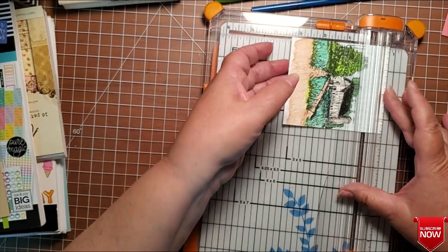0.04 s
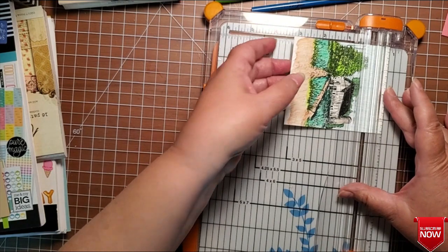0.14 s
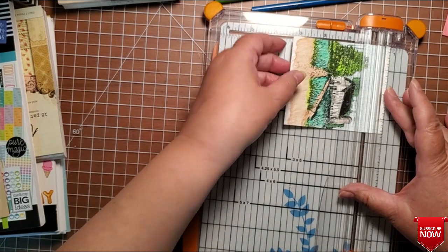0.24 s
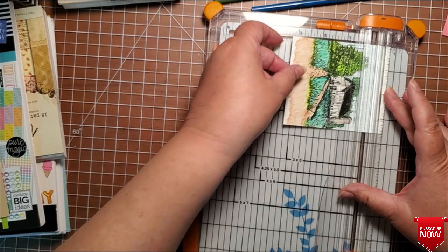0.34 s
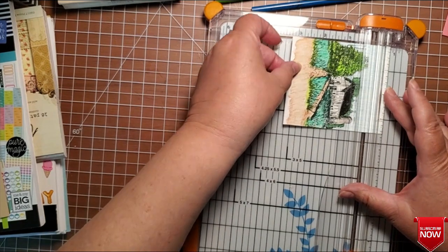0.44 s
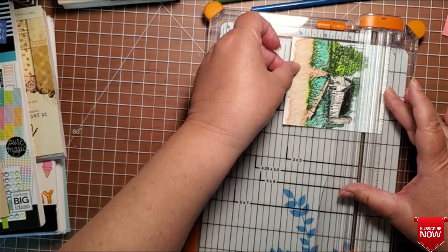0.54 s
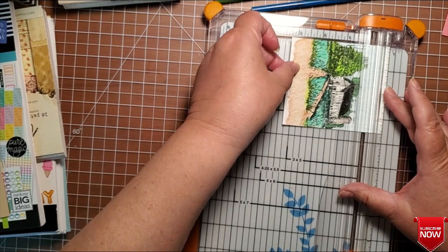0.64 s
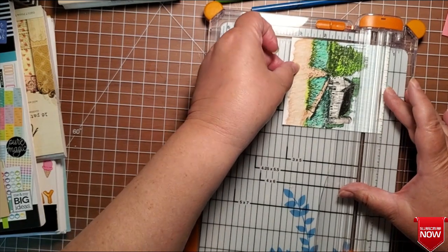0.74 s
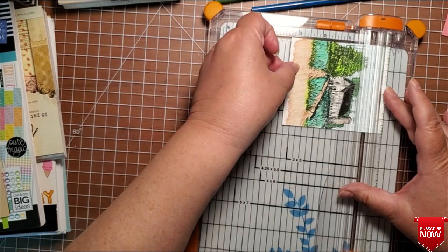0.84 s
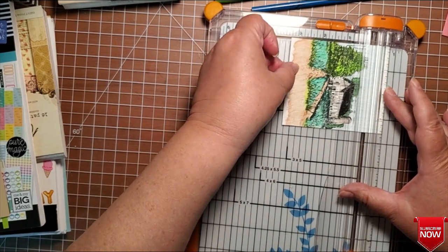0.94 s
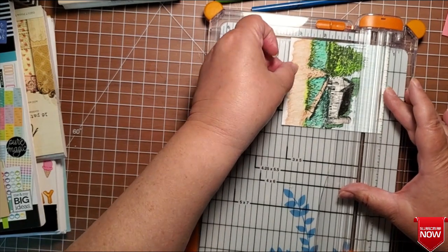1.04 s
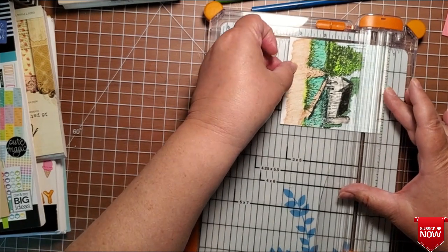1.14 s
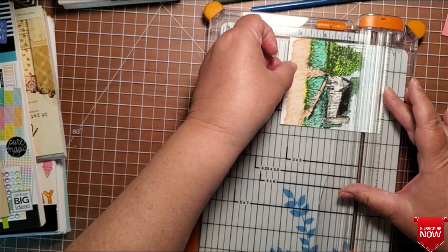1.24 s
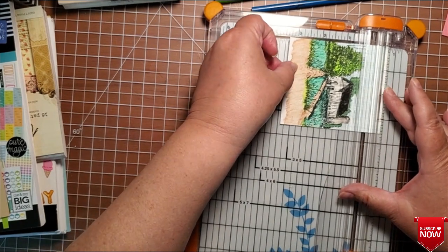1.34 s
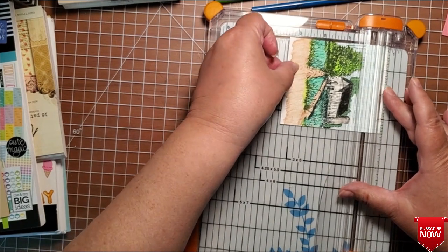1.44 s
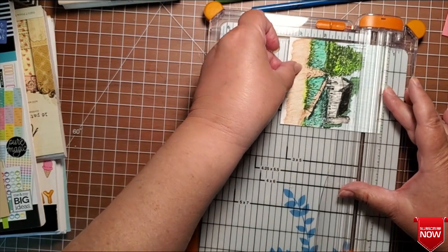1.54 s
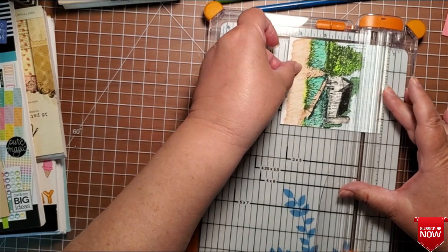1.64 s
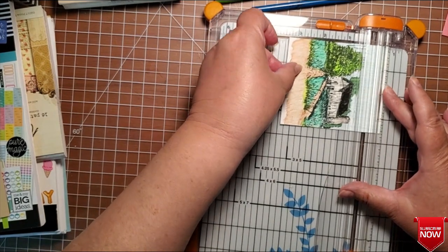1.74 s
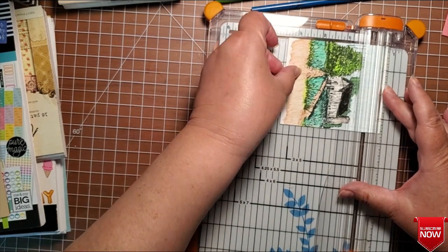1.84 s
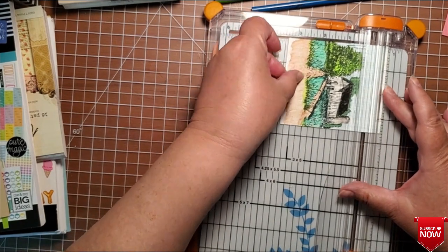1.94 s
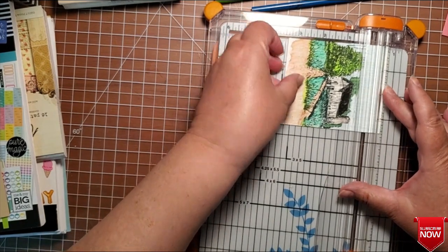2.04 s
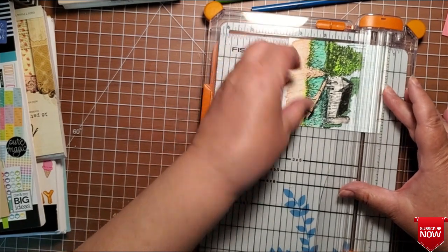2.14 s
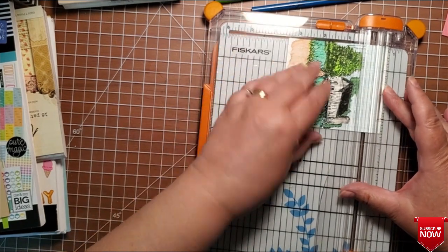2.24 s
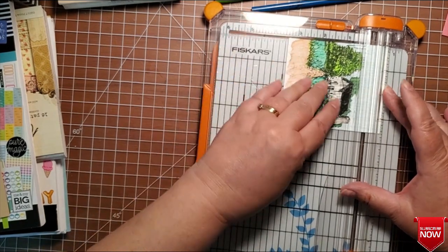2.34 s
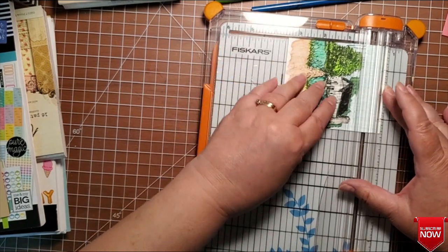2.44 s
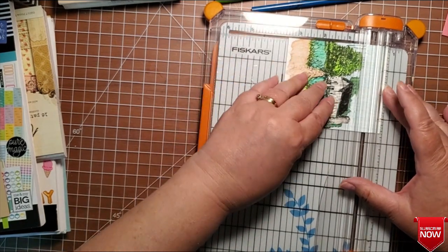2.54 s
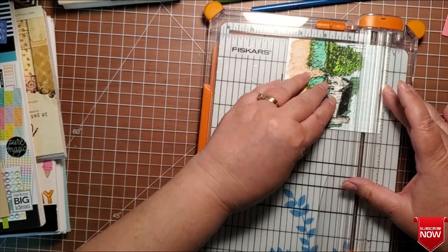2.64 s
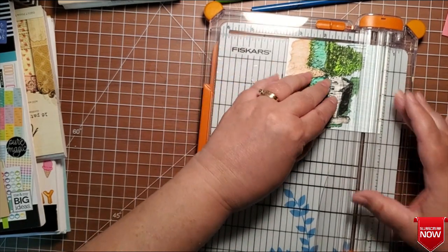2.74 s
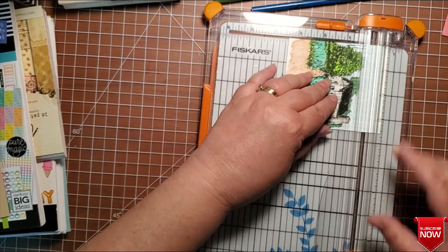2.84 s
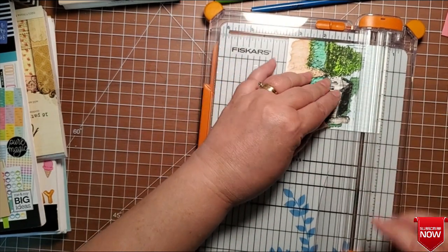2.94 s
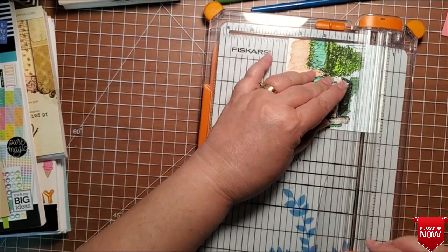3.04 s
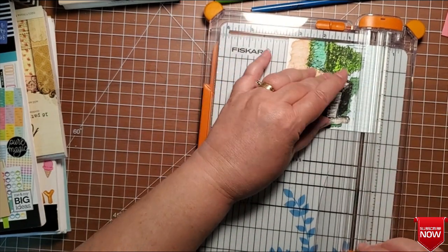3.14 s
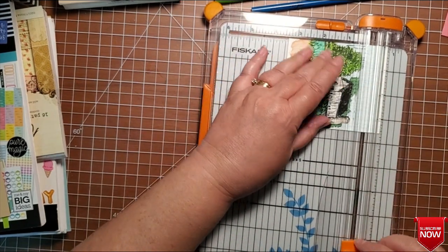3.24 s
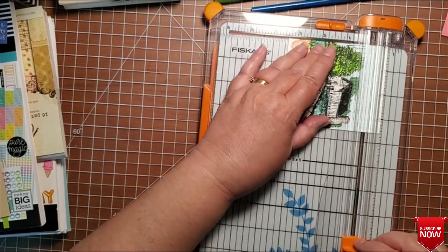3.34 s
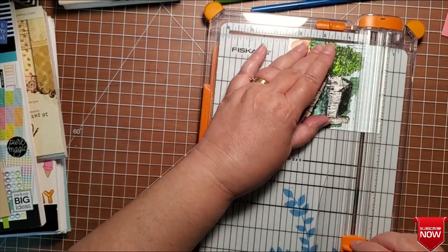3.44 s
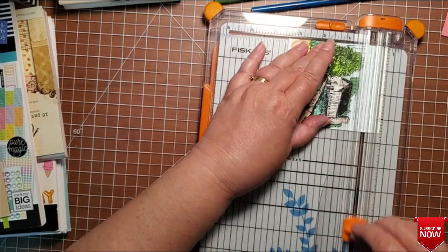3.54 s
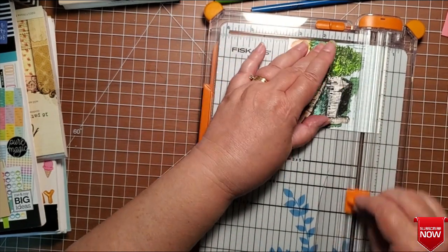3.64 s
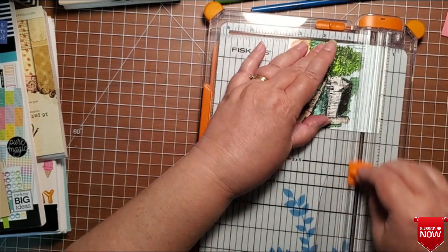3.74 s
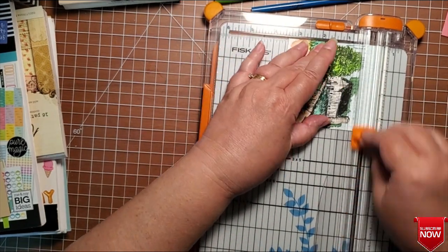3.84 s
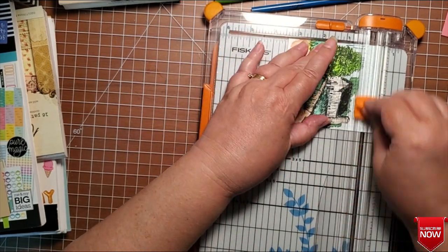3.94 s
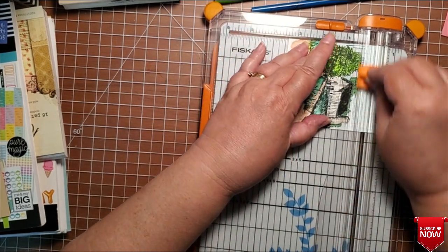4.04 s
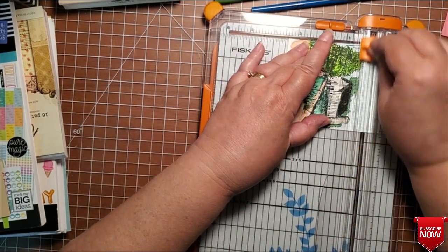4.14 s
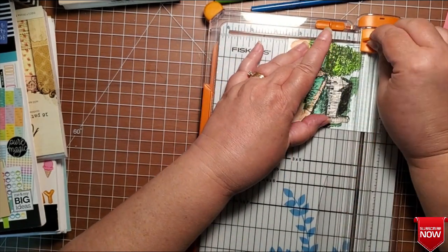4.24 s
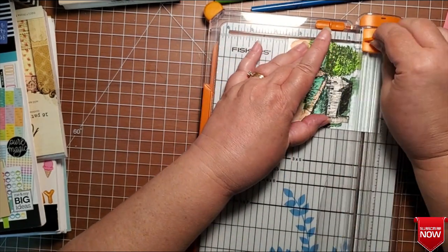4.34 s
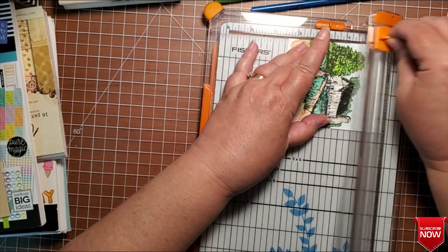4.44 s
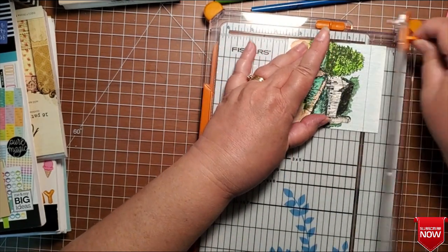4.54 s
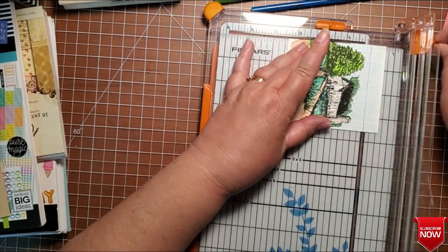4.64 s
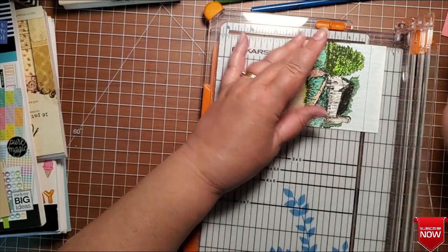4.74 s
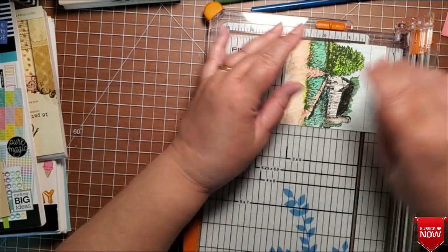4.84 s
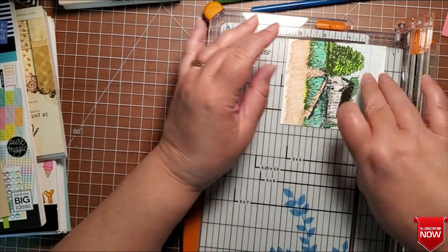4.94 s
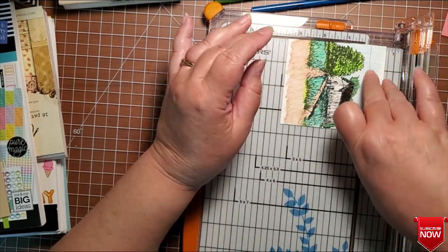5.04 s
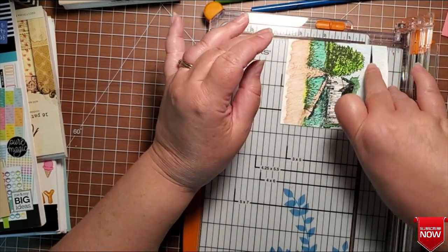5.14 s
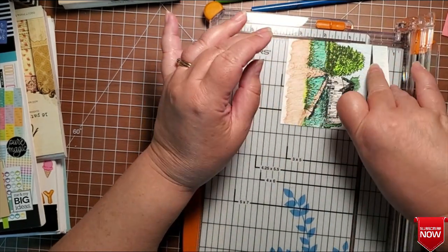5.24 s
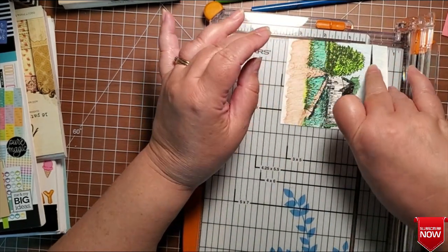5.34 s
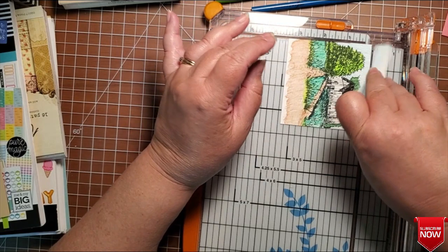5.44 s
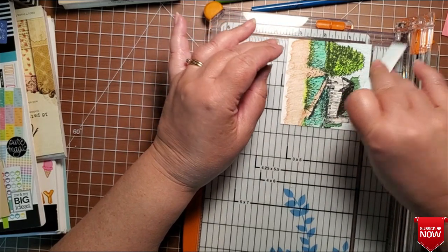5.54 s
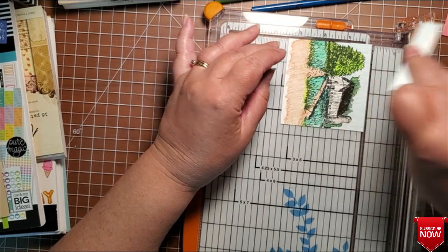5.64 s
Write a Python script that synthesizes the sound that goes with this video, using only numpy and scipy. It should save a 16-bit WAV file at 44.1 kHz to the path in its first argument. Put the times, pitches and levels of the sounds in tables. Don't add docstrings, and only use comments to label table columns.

```python
import sys
import numpy as np
from scipy import signal
from scipy.fft import rfft, irfft
from scipy.io import wavfile
from scipy.ndimage import uniform_filter1d

SR = 44100
rng = np.random.default_rng(int(sys.argv[2]) if len(sys.argv) > 2 else 0)


def makeup_ratio(level_db):
    decades = np.asarray(level_db, float) / 20
    return 10 ** decades


def waveform_to_disk(signal):
    frames = np.transpose(np.atleast_2d(signal))
    scaled = np.clip(frames, -1, 1) * 32767
    samples = np.round(scaled).astype(np.int16)
    wavfile.write(sys.argv[1], SR, samples)


N = 251370
TIME = np.arange(N) / SR


def unit(x):
    return x / np.sqrt(np.mean(x ** 2))


def peak(x):
    return x / np.abs(x).max()


def butter(order, hz, kind="low"):
    return signal.butter(order, hz, kind, fs=SR, output="sos")


def colour(x, table):
    hz, db = np.transpose(table)
    bins = np.maximum(np.arange(2049) * SR / 4096, 1)
    log_gain = np.interp(np.log(bins), np.log(hz), db) * np.log(10) / 20
    cepstrum = irfft(log_gain)
    cepstrum[1:2048] *= 2
    cepstrum[2049:] = 0
    return signal.oaconvolve(x, irfft(np.exp(rfft(cepstrum))))[:len(x)]


def ring(x, hz, t60):
    pole = np.exp(2j * np.pi * hz / SR - np.log(1000) / (t60 * SR))
    return signal.lfilter([1], [1, -pole], x).imag


def walk(rate):
    hold = int(SR / rate)
    steps = np.repeat(rng.standard_normal(N // 20), hold)[:N]
    return 1.25 * uniform_filter1d(uniform_filter1d(steps, hold), hold)


def grit(spread_db):
    size_db = spread_db * np.minimum(rng.exponential(size=N), 5)
    return unit(rng.standard_normal(N) * makeup_ratio(size_db))


def stroke(s, db, rise_s, fall_s):
    return makeup_ratio(db - 15 * np.maximum((s - TIME) / rise_s, (TIME - s) / fall_s))


def pressed(curve, layers):
    s, db = np.transpose(curve)
    gate = np.interp(TIME, [s[0] - 0.006, s[0], s[-1] + 0.014, s[-1] + 0.023], [0, 1, 1, 0])
    pressure_db = np.interp(TIME, s, db - db.mean())
    return [gate * makeup_ratio(mean_db + slope * pressure_db) for mean_db, slope in layers]


def wide(table, spread_db, apart):
    common, out = grit(spread_db), []
    for _ in range(2):
        x = colour(common + apart * grit(spread_db), table)
        lag_s = 0.000704 * makeup_ratio(1.52 * walk(13))
        out.append(unit(x + 0.35 * np.interp(TIME - lag_s, TIME, x)))
    return np.array(out)


PATCH_EDGES_HZ = [1500, 4500, 7500, 9700, 11500]


def patchy(v, patchy_db):
    lows = [0] + [signal.sosfilt(butter(2, hz), v) for hz in PATCH_EDGES_HZ] + [v]
    return sum((upper - lower) * makeup_ratio(patchy_db * walk(45)) for lower, upper in zip(lows, lows[1:]))


# resonance in Hz, level in dB, t60 in seconds.
BOARD = [(85, 0.5, 0.14), (132, -10, 0.38), (168, -10.5, 0.088), (225, -1, 0.071), (266, 0, 0.11),
         (353, -11.5, 0.43), (511, 5, 0.048), (575, 6.5, 0.035), (724, 3.5, 0.056), (842, 9.5, 0.023),
         (990, -1.5, 0.039), (1270, 11, 0.018), (1560, -28, 0.013)]


def board(push, damping, spot_hz, focus_db):
    out = 0
    for hz, db, t60 in BOARD:
        octaves_off = abs(np.log2(hz / spot_hz))
        out = out + makeup_ratio(db - focus_db * octaves_off) * ring(push, hz, t60 * damping)
    return out


def friction(gains, top, body, spread_db, patchy_db, focus_db, damping):
    hiss = patchy(wide(top, spread_db, 7.7), patchy_db)
    ringing = patchy(wide(body, spread_db, 0.71), patchy_db)
    rumble = unit(board(np.diff(grit(spread_db), prepend=0), damping, 390, focus_db))
    layers = zip([hiss, ringing, rumble], gains)
    return sum(v * gain * makeup_ratio(patchy_db / 2 * walk(60)) for v, gain in layers)


# time in seconds, pressure in dB.
CUT = [
    (3.893, -41.5),
    (3.9, -41),
    (3.931, -42),
    (4.021, -38.5),
    (4.061, -39),
    (4.075, -36),
    (4.133, -40.5),
    (4.188, -41.5),
]
# level at mean pressure in dB, slope in dB per dB of pressure.
CUT_LAYERS = [(-44, 0.85), (-39.5, 1), (-45.5, 0.16)]
# frequency in Hz, gain in dB.
FIBRE = [(3000, -48), (7000, -23), (8300, -2.5), (9600, -4.5), (10400, 2), (11300, -3.5), (12700, 0),
         (15500, -2.5)]
# frequency in Hz, gain in dB.
BLADE = [(900, -8.5), (1800, -7), (2800, -10.5), (4300, -7), (5900, -3.5), (7000, -8.5), (9000, -58.5)]


def blade_cut():
    gains = pressed(CUT, CUT_LAYERS)
    return friction(gains, FIBRE, BLADE, spread_db=2.0, patchy_db=2.0, focus_db=8.0, damping=0.28)


# peak in seconds, pitch in Hz, level in dB, length in seconds.
FLARES = [(3.905, 10700, -43.5, 0.014), (3.9, 13600, -52, .02), (3.95, 5900, -41.5, .03),
          (3.985, 10200, -50, 0.035), (4.02, 10400, -46, 0.039), (4.015, 5900, -42.5, .03),
          (4.04, 11300, -54, .015), (4.06, 6400, -41, 0.035), (4.078, 10450, -48.5, .012),
          (4.095, 5700, -41, .03), (4.1, 12700, -53, .04), (4.12, 8900, -48, .025),
          (4.128, 4900, -38.5, .02), (4.15, 10300, -54, .05), (4.16, 5600, -49.5, 0.028)]


def flares():
    out = np.zeros((2, N))
    a, b = int(3.8 * SR), int(4.3 * SR)
    for s, hz, db, length in FLARES:
        slips = rng.standard_normal((3, b - a))
        rings = unit(ring(slips[0] + slips[1:], hz, 0.004))
        out[:, a:b] += stroke(s, db, length, length)[a:b] * rings
    return out


# time in seconds, pressure in dB.
SLIDE = [
    (3.44, -72.5),
    (3.49, -66),
    (3.532, -63),
    (3.572, -62.5),
    (3.62, -60),
    (3.678, -54),
    (3.718, -58.5),
    (3.858, -57),
    (3.888, -55.5),
]
# level at mean pressure in dB, slope in dB per dB of pressure.
SLIDE_LAYERS = [(-61, 1.13), (-59.5, 1.4), (-65.5, 1.45)]
# frequency in Hz, gain in dB.
SKIN = [(1500, -32.5), (4000, -3), (6500, 2.5), (8000, -3), (10500, -1.5), (13000, 4), (15500, -4.5)]
# frequency in Hz, gain in dB.
RAIL = [(900, 2), (1800, 6.5), (2900, 3.5), (4300, 3), (5800, 0.5), (7000, -11), (9000, -59)]


def carriage_slide():
    gains = pressed(SLIDE, SLIDE_LAYERS)
    return friction(gains, SKIN, RAIL, spread_db=2.2, patchy_db=2.0, focus_db=24.0, damping=0.38)


def snaps(events, body, ring_t60, broad_share):
    t = np.arange(4096) / SR
    out = np.zeros((2, N + len(t)))
    for s, db, hz, top_db, t60, pan_db in events:
        size, common, left, right = rng.standard_normal((4, len(t)))
        fade = np.abs(size) * makeup_ratio(-60 * t / t60)
        at = int(s * SR)
        for port, side, own in [(0, 1, left), (1, -1, right)]:
            burst = (common + 1.3 * own) * fade
            burst[0] = 0.58
            sound = peak(peak(ring(burst, hz, ring_t60)) + broad_share * peak(colour(burst, body)))
            sound = sound + makeup_ratio(top_db) * peak(colour(burst, SKIN))
            out[port, at:at + len(t)] += makeup_ratio(db + side * pan_db / 2) * sound
    return out[:, :N]


# start in seconds, peak in dB,
# ring in Hz, bright crack in dB re peak, t60 in seconds.
CLACKS = [(2.7154, -32, 3000, -10.5, 0.01), (2.7172, -41, 5100, -14, 0.046), (2.72, -45, 1700, -13, 0.022),
          (3.4299, -29.5, 4900, -8, 0.017), (3.4322, -30, 2780, -17, 0.037),
          (3.433, -33.5, 4930, -12, 0.042), (3.44, -44, 2970, -28, 0.025), (4.196, -9, 5400, -1.5, 0.0086),
          (4.1978, -18.5, 8800, -20, .007), (4.1986, -4, 5500, -37, 0.01),
          (4.204, -16.5, 5500, -12.5, 0.03), (4.2102, -17, 5640, -8.5, 0.018), (4.212, -19, 3710, -11, .02),
          (4.217, -31, 1600, -20, .05), (4.652, -51, 6000, 16.5, 0.045), (4.6547, -31, 4630, -26.5, 0.069),
          (4.6860, -25.5, 5300, -11.5, 0.019), (4.69, -37, 3040, -25, 0.08), (2.815, -40, 5440, -16, 0.013),
          (4.99, -57, 1500, -22, .02), (5.13, -57, 1710, -27, 0.021), (5.1437, -54, 1700, -22, 0.025)]
# frequency in Hz, gain in dB.
PLASTIC = [(500, -26), (1400, 5), (2000, 4), (2900, -21), (4300, -24.5), (5800, -4), (7000, -1.5),
           (9000, -56)]


def plastic_clacks():
    events = [(*row, -0.2) for row in CLACKS]
    return snaps(events, PLASTIC, 0.0015, 0.27)


# start in seconds, peak in dB, ring of the struck spot in Hz,
# thud in dB re peak.
KNOCKS = [(0.065, -53, 460, -15), (1.798, -48.5, 603, -14), (2.269, -49, 816, -2), (2.671, -62, 700, 4),
          (2.818, -51, 597, -2), (2.955, -56.5, 590, -5), (3.158, -49, 494, 4), (3.179, -51, 710, 0),
          (3.184, -53, 1180, 1), (3.19, -46.5, 396, 6.5), (3.27, -46, 575, -15), (3.293, -52, 580, -33),
          (3.43, -37.5, 935, -14), (3.4422, -41, 720, -7.5), (3.468, -42, 830, -13), (3.486, -50, 710, -8),
          (3.661, -45, 454, -6), (3.787, -48, 493, -10), (3.744, -45.5, 705, -22), (3.759, -63, 560, -9),
          (4.199, -33.5, 513, 6), (4.2045, -25.5, 576, -22), (4.2094, -24.5, 880, -4.5),
          (4.215, -48, 609, -5), (4.257, -27, 558, -3), (4.28, -54, 810, -25), (4.293, -33.5, 700, -10),
          (4.317, -44, 655, -10), (4.363, -48.5, 610, -4.5), (4.475, -56, 950, -7), (1.733, -61, 800, -4),
          (4.655, -39.5, 760, -12), (4.671, -26, 823, -3.5), (4.689, -44.5, 840, -25),
          (4.77, -32.5, 810, -4), (4.833, -61, 780, 3), (4.989, -47, 733, -3.5), (5.146, -52, 635, 4.5),
          (5.13, -65, 620, -2), (5.331, -65, 840, -8)]


def knocks():
    t = np.arange(8192) / SR
    out = np.zeros(N + len(t))
    soft = butter(4, 1070)
    for s, db, spot_hz, thud_db in KNOCKS:
        contact_ms = 0.56 * 2 ** (-(db + 48.0) / 73)
        push = np.sin(np.pi * np.minimum(t * 1000 / contact_ms, 1))
        bounce = int(SR * rng.uniform(0.00318, 0.00711))
        push[bounce:] += 0.42 * push[:-bounce].copy()
        rattle = rng.standard_normal(len(t)) * makeup_ratio(-60 * t / 0.2)
        answer = np.diff(board(push, 0.84, spot_hz, 3.7), prepend=0)
        shiver = np.diff(board(rattle, 0.22, spot_hz, 1.8), prepend=0)
        body = peak(ring(push, spot_hz, 0.024)) + 1.3 * peak(answer)
        body = peak(body) + 0.27 * peak(shiver)
        thud = np.interp(t - 0.006, t, board(push, 0.96, 170, 12.0), left=0)
        sound = peak(signal.sosfilt(soft, body) + 0.11 * body) - makeup_ratio(thud_db) * peak(thud)
        at = int((s + 0.001) * SR)
        out[at:at + len(t)] += makeup_ratio(db - 0.5) * sound
    return out[:N]


# peak in seconds, pitch in Hz, level in dB,
# length in seconds.
SUNG = [(0.213, 533, -69, .04), (0.26, 554, -65.5, .06), (3.17, 582, -50, 0.014),
        (3.173, 1550, -60.5, 0.016), (3.297, 850, -58, 0.013), (3.443, 885, -42.5, 0.0042),
        (3.472, 850, -53, 0.01), (3.573, 530, -60.5, .03), (3.63, 560, -74, .02), (3.675, 450, -56.5, 0.02),
        (3.739, 522, -61, .03), (3.791, 480, -64, .025), (3.807, 1400, -61, .03), (3.929, 789, -48, 0.018),
        (3.941, 1188, -43.5, 0.033), (3.942, 562, -52, 0.046), (3.99, 355, -49, .04),
        (4.02, 1760, -51.5, 0.053), (4.041, 504.7, -46.5, 0.016), (4.07, 1075, -51, 0.063),
        (4.075, 565, -42.5, 0.032), (4.103, 870, -49.5, 0.018), (4.175, 823, -47, 0.024),
        (5.305, 797, -69, 0.025), (1.886, 560, -68.5, 0.016), (1.918, 600, -71, .02),
        (1.978, 590, -70, .025), (2.015, 600, -74, 0.018), (3.958, 300, -61, .04), (4.03, 310, -50, 0.046)]


def sung():
    turn = 2 * np.pi * np.cumsum(1 + 0.045 * walk(90)) / SR
    rough = makeup_ratio(4 * walk(120))
    return rough * sum(stroke(s, db + 4.5, length, length) * np.sin(hz * turn) for s, hz, db, length in SUNG)


# most pressure in seconds, skin hiss in dB, rise in seconds,
# fall in seconds, board rumble in dB re hiss.
STROKES = [(0.07, -60, 0.066, 0.03, -12), (0.561, -68.5, 0.012, 0.035, -6), (1.12, -79, 0.11, 0.056, -5),
           (1.52, -73, 0.039, 0.061, -21), (1.791, -59.5, 0.013, 0.017, -4), (1.94, -72.5, 0.062, 0.1, 1),
           (2.1, -71.5, 0.019, 0.15, -41), (2.272, -88, 0.0039, 0.038, 15), (2.44, -87, 0.073, 0.91, 10),
           (2.725, -70, 0.0087, 0.2, 1.5), (2.79, -74.5, 0.037, 0.15, -13), (2.98, -73.5, 0.045, 0.097, -4),
           (3.175, -66.5, 0.014, 0.045, -4), (3.21, -62.5, 0.051, 0.068, -16),
           (3.3, -78.5, 0.19, 0.92, 5.5), (4.3, -72, 0.041, 0.2, -2.5), (4.7, -73, 0.067, 0.061, 17),
           (4.755, -76.5, 0.029, 0.024, 18), (4.8, -91.5, .03, 0.052, 18), (4.9, -90.5, 0.31, 0.12, -11),
           (5.165, -72, 0.032, 0.095, -6), (5.31, -75, .04, 0.15, -5), (5.41, -70, 0.13, 0.019, -12),
           (5.493, -65, 0.045, 0.067, -18), (5.53, -80, 0.032, 0.024, -3), (5.625, -70, 0.0043, 0.16, 2)]
# frequency in Hz, gain in dB.
SHEET = [(900, -29), (1800, -19), (2900, -3), (4300, 2), (5800, 2), (7000, -4), (9000, -51)]


def finger_strokes():
    hiss, rumble = makeup_ratio(-101.5), makeup_ratio(-89)
    for s, db, rise_s, fall_s, rumble_db in STROKES:
        pressure = stroke(s, db, rise_s, fall_s)
        hiss = hiss + pressure
        rumble = rumble + makeup_ratio(rumble_db) * pressure
    gains = [hiss, makeup_ratio(3.5) * hiss, rumble]
    return friction(gains, SKIN, SHEET, spread_db=1.6, patchy_db=2.5, focus_db=2.5, damping=0.6)


# time in seconds, pressure in dB.
DRAG = [
    (0.0, -69),
    (0.07, -55.5),
    (0.124, -66),
    (0.168, -62),
    (0.222, -56.5),
    (0.3, -59),
    (0.328, -40),
    (0.344, -61),
    (0.4, -67),
]
# level at mean pressure in dB, slope in dB per dB of pressure.
DRAG_LAYERS = [(-76.5, 0.53), (-64.5, 1), (-77.5, 0.083)]
# frequency in Hz, gain in dB.
EDGE = [(1200, -19), (2000, -11), (2600, -6.5), (3200, 1), (3900, -1), (5200, -5), (6600, -18), (8000, -29)]


def edge_drag():
    gains = pressed(DRAG, DRAG_LAYERS)
    return friction(gains, SKIN, EDGE, spread_db=3.0, patchy_db=3.0, focus_db=40, damping=2.5)


# start in seconds, peak in dB, ring in Hz,
# bright crack in dB re peak, left minus right in dB.
NUDGES = [(0.0555, -44, 5760, -22, 9), (0.0595, -45, 6220, -25.5, 6), (0.073, -46, 3500, -22, -3),
          (0.0642, -39, 3620, -23, -1), (0.1274, -53, 3480, -25, 0), (0.1533, -55, 3680, -25, 2),
          (0.1703, -51, 2800, -25, 2), (0.1882, -45.5, 2920, -28, -2), (0.2079, -42, 3080, -30, -2),
          (0.2512, -46, 2770, -29, -5), (0.2798, -45, 3100, -27, -3), (0.3071, -39, 2830, -31, -7),
          (0.3155, -37, 2800, -25, -2), (0.321, -38, 3100, -22, 4), (0.214, -53, 2920, -25, 4),
          (0.3265, -37, 2650, -7, -2), (0.557, -57, 3180, -29, 5), (0.559, -48.5, 4730, -22, 11),
          (1.077, -55, 3200, -37, 11.5), (1.7518, -54, 3980, -18, 9), (1.7898, -48, 6600, -25, 14),
          (1.7956, -44, 5640, -23, -3), (2.142, -58, 6300, -19, 8), (2.2724, -60, 5400, -20, 6),
          (2.9528, -57, 3980, -15, 5), (0.566, -56.5, 3030, -28, 5), (2.866, -54, 5900, 3, 1)]
# start in seconds, peak in dB, ring in Hz,
# bright crack in dB re peak, left minus right in dB.
LIFTS = [
    (4.7114, -48, 3670, -21, -5),
    (4.7485, -39.5, 4780, -17, -4),
    (4.99, -59, 3900, -36, 7.5),
    (5.1439, -46, 5280, -3.5, 5),
    (5.1557, -42.5, 5790, -8, 1),
    (5.2053, -51, 5540, -29, 3),
    (5.4151, -47.5, 5130, -18, 2),
    (5.482, -56.5, 2870, -23, 6),
    (5.68, -39.5, 6630, 4, 8.5),
]


def card_snaps():
    events = []
    for rows, cycles in [(NUDGES, 100), (LIFTS, 117)]:
        for s, db, hz, top_db, pan_db in rows:
            events.append((s, db, hz, top_db, cycles / hz, pan_db))
    return snaps(events, SHEET, 0.0098, 0.42)


# frequency in Hz, gain in dB.
PORT_LEFT = [(150, -0.5), (500, 1), (1500, -2.5), (3000, 7), (4500, 3.5), (6000, 9.5), (7200, 6.5),
             (10500, 7), (13500, 4.5), (15500, -12)]
# frequency in Hz, gain in dB.
PORT_RIGHT = [(150, -1.5), (500, -2), (1500, -6.5), (3000, 0), (4500, -5), (6000, -3.5), (7200, -8.5),
              (10500, 4.5), (13500, -5), (15500, 2)]


def ports(pair):
    t, out = np.arange(int(0.4 * SR)) / SR, []
    shared = rng.standard_normal(len(t))
    for x, port, lag in zip(pair, [PORT_LEFT, PORT_RIGHT], [3, 0]):
        own = rng.standard_normal(len(t))
        echo = own + signal.sosfilt(butter(1, 900), shared - own)
        dull = signal.sosfilt(butter(2, 4030), echo)
        tail = dull * makeup_ratio(-60 * t / 0.24) + (echo - dull) * makeup_ratio(-60 * t / 0.16)
        tail = tail * (t > 0.003)
        path = makeup_ratio(-8) * tail / np.linalg.norm(tail)
        path = path - (1 - makeup_ratio(-3)) * signal.sosfiltfilt(butter(1, 1300), path)
        path[lag] += 1
        out.append(colour(signal.oaconvolve(x, path)[:N], port) / np.linalg.norm(path))
    return np.array(out)


# time in seconds, level in dB.
SWELL = [(0.0, -55), (0.22, -48), (0.62, -54), (0.65, -53), (2.05, -47.5), (2.11, -67), (2.28, -56),
         (2.56, -59), (2.87, -46), (3.06, -51.5), (3.13, -49.5), (3.84, -53), (4.08, -43.5), (4.13, -46),
         (5.03, -56.5), (5.51, -45.5), (5.59, -64), (5.7, -52)]
# pitch in Hz, level in dB re boom, t60 in seconds.
STIRRED = [(62.66, -2, 0.25), (92.1, -17, 0.84), (121.8, -17.5, 0.42)]


def room_boom():
    phase = 2 * np.pi * np.cumsum(60.6 + 0.83 * walk(5.5) + 1.55 * walk(17)) / SR
    tone = np.sqrt(2) * makeup_ratio(2 * walk(13)) * np.sin(phase)
    stirred = sum(makeup_ratio(db) * unit(ring(rng.standard_normal(N), hz, t60)) for hz, db, t60 in STIRRED)
    return makeup_ratio(np.interp(TIME, *np.transpose(SWELL)) - 2.5) * (tone + stirred)


# frequency in Hz, gain in dB.
AIR = [(20, -22.5), (35, -6), (60, -2.5), (90, -3), (130, -13.5), (180, -19), (300, -25), (480, -32.5),
       (700, -50.5), (1400, -65.5)]
# time in seconds, level in dB.
AIR_SWELL = [
    (0, 1.5),
    (1, -0.5),
    (2, -0.5),
    (3, 0.5),
    (4, 3),
    (4.8, 1.5),
    (5.3, -0.5),
    (5.7, 5),
]


def room_air():
    mid, side = (colour(rng.standard_normal(N), AIR) for _ in range(2))
    side = signal.sosfilt(butter(1, 300, "high"), side)
    air = (mid + 0.72 * side * np.array([[1], [-1]])) / np.std(mid)
    swell_db = np.interp(TIME, *np.transpose(AIR_SWELL)) + 0.94 * walk(3.3)
    return makeup_ratio(-58.5 + swell_db) * air


# frequency in Hz, gain in dB.
HISS_LEFT = [(600, -16.5), (2400, -20.5), (2900, -4.5), (3700, 0.5), (4700, -4), (5900, -3), (6800, -11),
             (7300, -29.5), (11500, -22), (15500, -26.5)]
# frequency in Hz, gain in dB.
HISS_RIGHT = [(600, 12), (2700, 3.5), (5000, -22), (6100, -13), (6500, -9), (7600, -12), (9000, -7),
              (12000, 3), (15500, -6.5)]


def port_hiss():
    rows = [(-61.5, HISS_LEFT), (-79, HISS_RIGHT)]
    return np.array([makeup_ratio(db) * unit(colour(rng.standard_normal(N), table)) for db, table in rows])


def scene():
    rubbing = blade_cut() + carriage_slide() + finger_strokes() + edge_drag()
    singing = flares() + sung()
    hits = plastic_clacks() + knocks() + card_snaps()
    return ports(rubbing + singing + hits) + room_boom() + room_air()


def low_pass(x):
    return signal.sosfilt(signal.butter(12, 16500, fs=SR, output="sos"), x)


def record(dry):
    steep = signal.ellip(14, 0.2, 70, 15790, fs=SR, output="sos")
    mix = signal.sosfilt(steep, dry + port_hiss())
    return low_pass(np.clip(mix, -1, 1))


dry = scene()
out = record(dry)
waveform_to_disk(out)
```